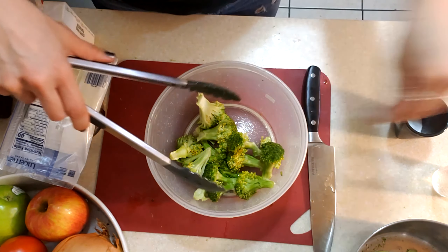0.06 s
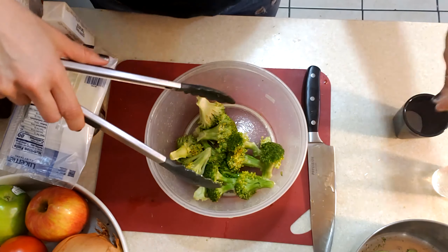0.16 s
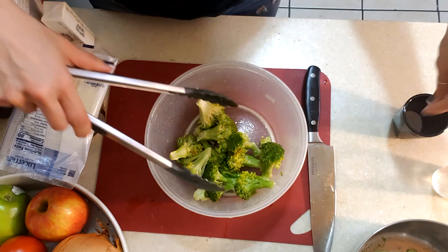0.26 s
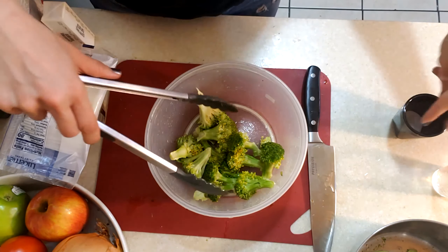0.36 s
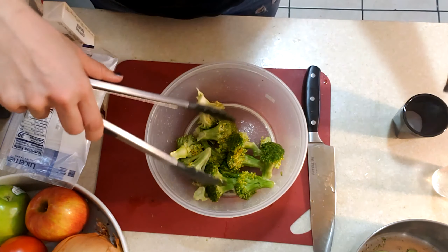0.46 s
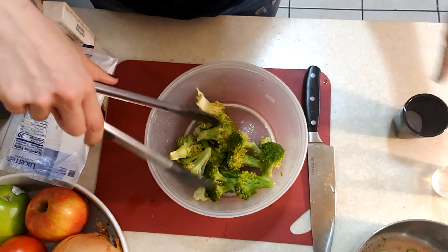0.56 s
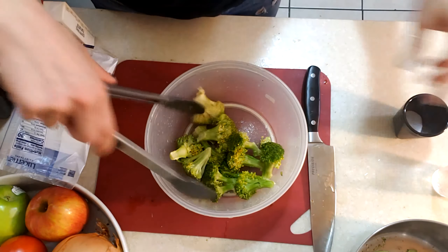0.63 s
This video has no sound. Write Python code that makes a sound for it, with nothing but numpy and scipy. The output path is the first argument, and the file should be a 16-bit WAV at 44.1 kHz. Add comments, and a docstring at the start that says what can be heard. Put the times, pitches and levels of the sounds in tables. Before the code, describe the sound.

Close clattering of tong tips and florets against a plastic bowl, uneven bursts with a brief quiet gap, over a faint refrigerator hum.

```python
"""Steel tongs toss florets in a plastic bowl on a board, in a small hard-walled kitchen.
Tong tips and florets knock the bowl: noise bursts coloured by its resonances. Strokes through the
florets are filtered friction grains; the tong hinge jingles in decaying sines. A refrigerator hums in
sines; steady narrow noise tones, low drones and one faint thin whine, lie over the room air.
A close stereo microphone ducks its bass."""
import sys
import numpy as np
from scipy import signal
from scipy.fft import rfft, irfft, next_fast_len
from scipy.io import wavfile
from scipy.ndimage import uniform_filter1d

SR = 44100
rng = np.random.default_rng(int(sys.argv[2]) if len(sys.argv) > 2 else 0)


def int16_out(signal):
    """Quantize to a 16-bit WAV file."""
    q = np.round(np.clip(np.atleast_2d(signal).T, -1, 1) * 32767)
    wavfile.write(sys.argv[1], SR, q.astype(np.int16))


N = 412776
HZ = np.fft.rfftfreq(next_fast_len(N + SR), 1 / SR) + 1   # +1 keeps the log finite

# refrigerator tones: (frequency [Hz], level [dB rms before the microphone])
HUM_TONES = [(59.2, -71.5), (118.4, -74)]
# steady narrow noise tones, low drones and one faint thin whine: (centre [Hz], width [Hz], level [dB])
NARROW_TONES = [(247, 25, -81.5), (293, 20, -79.5), (345, 12, -85.5), (573, 16, -89), (519, 9, -84),
                (8300, 12, -101)]
# room air spectrum, shape only: (frequency [Hz], density [dB])
AIR_SPECTRUM = [(20, -21), (50, -17), (95, -20.5), (170, -8), (260, -6.5), (420, -9), (700, -16.5),
                (1000, -22.5), (4400, -29), (7500, -37.5), (13000, -31), (16500, -35.5)]
AIR_DB = -75.5

# tong strokes through the florets: (start [s], length [s], rumble level [dB], hiss level [dB])
TONG_STROKES = [(0.237, 0.052, -55.5, -64), (0.672, 0.17, -57.5, -60), (1.032, .12, -59, -62),
                (1.417, 0.066, -65, -78), (2.122, 0.035, -70, -61), (2.33, 0.023, -46.5, -74),
                (2.54, 0.23, -52, -58.5), (3.143, 0.048, -64, -70), (3.281, 0.13, -56, -66),
                (3.801, 0.035, -95, -83), (5.515, 0.023, -61, -59), (5.877, 0.055, -44.5, -72),
                (5.994, 0.05, -57.5, -60), (6.4, 0.093, -55, -66), (6.548, 0.071, -64.5, -63),
                (6.7, 0.089, -76, -75), (7.056, .1, -58, -68), (7.56, 0.083, -49.5, -54),
                (8.079, 0.11, -55, -80), (8.252, 0.18, -63.5, -63.5), (8.66, 0.17, -75.5, -96)]
STROKE_ATTACK_DB_PER_S, STROKE_RELEASE_DB_PER_S = 496, 171.5
# light stirring under the strokes: (time [s], rumble level [dB], hiss level [dB])
STIR_LEVELS = [(0, -68.5, -79.5), (0.4, -74.5, -96), (0.6, -84.5, -89), (1.3, -69.5, -76),
               (2.0, -67.5, -77), (2.9, -82, -81), (3.1, -64.5, -75.5), (3.6, -69.5, -82),
               (4.1, -80.5, -86.5), (5.3, -80.5, -87), (5.6, -67.5, -82.5), (6.201, -62.5, -77),
               (6.901, -81.5, -81.5), (7.3, -69.5, -75), (7.9, -79.5, -89), (8.85, -65.5, -83),
               (9.0, -97.5, -103), (9.36, -79, -87.5)]
# friction spectra, shape only: (frequency [Hz], density [dB])
RUMBLE_SPECTRUM = [(40, -6), (120, -15.5), (300, 0.5), (800, -1.5), (1600, -8), (3000, -31)]
HISS_SPECTRUM = [(900, -16.5), (2200, -3), (5000, -2.5), (7000, -11.5), (12000, -5), (16000, -13)]

# tong tips and florets on the bowl: (time [s], peak [dB before pan and microphone],
# board thud, hollow ring, brightness [dB re wall clack], contact decay [ms], favoured note [Hz])
BOWL_KNOCKS = [(0.674, -32, -7.5, -5, -9.5, 6.7, 1200), (0.717, -42.5, -14.5, -4, -7.5, 3.1, 1430),
               (0.743, -7, -13, -6.5, -8.5, 2.46, 1140), (0.799, -9.5, -12.5, -7.5, -10, 2.6, 1330),
               (0.828, -15, -30, -2, -8.5, 2.8, 886), (1.049, -16.5, -10.5, -8.5, -3, 4.3, 1430),
               (1.078, -2, -10.5, -6.5, 5, 3.77, 2400), (1.163, -20.5, -7, 9.5, 2.5, 2.8, 773),
               (1.177, -30, 3.5, -5, -0.5, 3.1, 740), (1.441, -36.5, 8.5, 16.5, 14, 6, 3480),
               (1.479, -41.5, -2, 11.5, 11.5, 13.5, 3450), (1.505, -46, -2, 5, 16, 4, 3450),
               (1.527, -46, 9, 14, 13, 7.6, 755), (1.592, -50.5, -13, 5, -1, 4.9, 765),
               (1.705, -41, 6.5, 0.5, -9, 3.8, 517), (1.862, -40.5, -5, -16.5, 3.5, 22, 2500),
               (1.927, -45, -15, -1.5, 11.5, 11, 2500), (1.989, -23.5, -4.5, -10, 4, 3.1, 2360),
               (2.038, -16.5, -13.5, -11.5, 3.5, 3, 2430), (2.065, -23, 6.5, 4, -18, 2.3, 859),
               (2.103, -11.5, -18.5, 11, -7, 3.7, 818), (2.303, -31.5, 0, 9, 3, 16.4, 604),
               (2.332, -23.5, -10, 13.5, 12.5, 4.9, 600), (2.355, -23.5, -17.5, 3, -8.5, 2.2, 976),
               (2.524, -13.5, -10.5, -11.5, 3, 4.26, 1125), (2.583, -21, -20.5, -19.5, -3, 4.6, 1148),
               (2.668, -29.5, 9.5, 14.5, 2.5, 16, 803), (2.685, -10, -5, 1, -3.5, 3.55, 744),
               (2.79, -40.5, 2, 5, 7, 9.6, 720), (3.127, -22, -18, -11, -1.5, 6.6, 1140),
               (3.261, -30, -12.5, -20, -6.5, 4.1, 2320), (3.311, -15.5, -7.5, -2, -11, 4.4, 750),
               (3.589, -42.5, -7, 2, -20, 4.7, 765), (3.729, -58, 14, -6, 6, 17, 2434),
               (4.005, -40.5, 1, 1, 8.5, 2.9, 2760), (4.028, -38, -6, -2, 12.5, 4.3, 2750),
               (4.322, -52, 38, 20, 14, 4.4, 531), (4.573, -57, -10, 4, 5.5, 17.5, 2750),
               (5.396, -7, -19.5, 5, -12.5, 3.1, 747), (5.454, -25, -14.5, 10.5, -6, 5.9, 768),
               (5.484, -25, -26.5, -2, -15.5, 2.3, 820), (5.518, -24, -9.5, -5.5, -21.5, 2.9, 750),
               (5.574, -31, -4, 15, -2.5, 4.8, 875), (5.739, -48, -16, 12, -26, 4.0, 770),
               (5.771, -35.5, -6.5, 24, -20, 5.1, 767), (5.832, -20.5, -24.5, -14, -12.5, 3.5, 1400),
               (5.872, -9, -8.5, -5, -6, 3.7, 1203), (5.974, -2.5, -16.5, -2, -7.5, 2.3, 790),
               (5.988, -15, -7.5, 10.5, -7.5, 2.4, 570), (6.294, -34.5, -15, -9, -6.5, 3.1, 1410),
               (6.353, -14.5, -9.5, -1, -4.5, 5.2, 1350), (6.525, -18.5, -42, -0.5, -8, 3.6, 730),
               (6.566, -35.5, -18, -10, 17, 3, 5200), (6.93, -20.5, -5.5, -10.5, -3.5, 5.8, 528),
               (6.954, -16.5, 1, -6, 0, 2.32, 532), (7.049, -2.5, -10, -3.5, -7.5, 2.95, 800),
               (7.274, -47.5, -17, -5, -13, 7, 762), (7.379, -39.5, -6, 5, -13.5, 4.3, 747),
               (7.412, -23, -7, -4.5, -3.5, 4, 592), (7.52, -34.5, -30, -1, -10, 1.8, 751),
               (7.547, -22.5, -4.5, -1.5, -2, 15, 1256), (7.608, -10.5, -21.5, 1, -12, 3.14, 1243),
               (7.927, -35, 6, 8, -4, 8.6, 902), (7.947, -14, 0.5, -13, 1, 3.2, 1120),
               (7.975, -21, -14, -5, -1.5, 8.7, 1110), (8.105, -17.5, -8, 3, -1, 3.9, 2450),
               (8.189, -32, -6, -2, -2.5, 4.5, 2530), (8.214, -24.5, -38, -37, -1, 12.3, 3940),
               (8.233, -28.5, -42, -7, -1, 3.5, 1480), (8.311, -40.5, -6, -4, -8.5, 2.2, 760),
               (8.35, -43, -3, 2, 0.5, 12.5, 1230), (8.44, -43.5, -4, -6, 2, 5.6, 538),
               (8.507, -46.5, 2, 24, -6, 4.0, 536), (8.576, -48.5, -10, 25, -5, 2, 771),
               (8.633, -50.5, -23, 11, -23, 4.5, 761), (8.674, -34.5, -13, -8.5, -16, 6.1, 529),
               (8.759, -49, -19, -5, -2, 13, 1200), (8.787, -35.5, -8.5, -3, -9.5, 3, 544)]
# centres of thud, hollow ring, clack, snap, tick: frequency [Hz]
KNOCK_BANDS_HZ = [290, 720, 1700, 4300, 10500]
# bowl and board resonances: (centre [Hz], width [Hz], mean lift [dB])
BOWL_RESONANCES = [(77.5, 17, 11.5), (182, 56, 5), (230, 130, 5.5), (318.8, 61, 11), (522.5, 28, 10.5),
                   (568, 55, 4), (670, 34, 7.5), (756.8, 62, 5), (908, 270, 3), (1170, 140, 4.5),
                   (1320, 150, 2), (1685, 49, -5), (1994, 280, 3), (2478, 360, 2.5), (2900, 110, 1.5),
                   (3560, 250, 1.5), (4802, 420, 4), (5420, 510, 2.5)]
TICK_PER_BRIGHTNESS, TICK_DB = 1.51, -6.5
RISE_MS, RISE_PER_CONTACT = 0.38, 0.36   # long contacts also start softly
NOTE_LIFT_DB, RIM_HZ, RIM_LIFT_DB = 6.5, 1880, 3.5   # every knock wakes the rim note
PAN_DB, PAN_SCATTER_DB = -1.1, 0.5   # left re right: fixed lean plus random scatter, new each knock
UNEVEN_DB, UNEVEN_FROM_HZ, UNEVEN_TO_HZ = 3, 1000, 5530   # scatter of broad resonances, new each knock

# tong hinge rattles: (time [s], level [dB before partial offsets])
HINGE_JINGLES = [(3.819, -68), (3.846, -64), (3.869, -63.5), (4.011, -47.5), (4.033, -48), (4.059, -62),
                 (4.315, -68), (4.329, -78), (4.577, -76), (4.601, -69), (4.619, -76)]
# steel arm partials: (frequency [Hz], mean offset [dB], t60 [s])
TONG_PARTIALS = [(2710, -6, 0.18), (2740, -10, 0.16), (4800, -2, .03), (7100, -1.5, 0.073),
                 (7500, -4, 0.044), (8030, 1, 0.068), (8500, -5, 0.037), (11000, -4, 0.051)]
HARD_JINGLE_DB, UPPER_DB_PER_DB = -35.5, 0.31   # upper partials lose this much extra below the hard level

# echo decay: (frequency [Hz], t60 [s])
ECHO_T60 = [(100, 0.41), (400, 0.32), (1000, 0.31), (2800, 0.32), (7000, .33), (15000, 0.23)]
# echo spectrum, shape only: (frequency [Hz], level [dB])
ECHO_COLOUR = [(60, 7), (250, -4.5), (700, -2), (2500, 1.5), (8000, -1.5), (15000, -1.5)]
ECHO_DB = -4

# stereo width, capped at 0 dB in use: (frequency [Hz], side re mid [dB])
STEREO_WIDTH = [(60, -14.5), (130, -18.5), (290, -10.5), (640, -9), (1410, -2), (3100, -3), (6820, -1),
                (15000, 0.5)]
# microphone ports: (frequency [Hz], left re right [dB])
PORT_LEAN = [(60, 0.5), (120, -2), (240, -1), (480, 1.5), (950, -1), (1890, -1.5), (3770, 6.5), (7520, -3),
             (15000, -8)]
CUTOFF_HZ = 16150


def amp(db):
    """Decibels to gain."""
    return 10 ** (np.asarray(db) / 20)


def unit(x):
    """Scale to rms 1."""
    return x / np.sqrt(np.mean(x ** 2) + 1e-20)


def at_hz(points, hz):
    """Read a (Hz, value) table on a log-frequency axis."""
    f, v = np.transpose(points)
    return np.interp(np.log(hz), np.log(np.maximum(f, 1)), v)


def shaped(x, gain):
    """Multiply the spectrum by a gain given on the grid HZ."""
    size = 2 * (len(HZ) - 1)
    return irfft(rfft(x, size) * gain, size)[..., :N]


def side_gain(hz):
    """Side re mid gain of a diffuse stereo sound."""
    return amp(np.minimum(at_hz(STEREO_WIDTH, hz), 0))


def spread(pair):
    """Two unrelated signals become mid and side of a left-right pair."""
    mid, side = pair[0], shaped(pair[1], side_gain(HZ))
    return np.array([mid + side, mid - side])


def peak_shape(hz, centre_hz, width_hz):
    """Resonance curve of height 1 and full width width_hz at half height."""
    return 1 / (1 + (2 * (hz - centre_hz) / width_hz) ** 2)


def background():
    """Refrigerator hum in sines, steady tones in narrow noise, room air in broad noise."""
    t = np.arange(N) / SR
    hum = np.zeros(N)
    for hz, level_db in HUM_TONES:
        hum += np.sqrt(2) * amp(level_db) * np.sin(2 * np.pi * (hz * t + rng.random()))
    colour = amp(AIR_DB) * unit(amp(at_hz(AIR_SPECTRUM, HZ)))
    for hz, width_hz, level_db in NARROW_TONES:
        colour = colour + amp(level_db) * unit(peak_shape(HZ, hz, width_hz))
    return hum + spread(shaped(rng.standard_normal((2, N)), colour))


def friction(column):
    """Gain of one friction layer: the stirring plus every stroke with its attack, hold and release."""
    t, stir = np.arange(0, N + 64, 64) / SR, np.transpose(STIR_LEVELS)
    gain = amp(np.interp(t, stir[0], stir[1 + column]))
    for start_s, length_s, *level_db in TONG_STROKES:
        before_s = np.maximum(start_s - t, 0)
        after_s = np.maximum(t - start_s - length_s, 0)
        slope_db = STROKE_ATTACK_DB_PER_S * before_s + STROKE_RELEASE_DB_PER_S * after_s
        gain = gain + amp(level_db[column] - slope_db)
    return np.interp(np.arange(N) / SR, t, gain)


def sliding():
    """Dense uneven grains of friction: a dull rumble through the bowl and a bright wet hiss."""
    out = 0
    for column, (colour, grains_per_s) in enumerate(((RUMBLE_SPECTRUM, 3500), (HISS_SPECTRUM, 4000))):
        sizes = amp(2.3 * np.minimum(rng.exponential(1, (2, N)), 4))
        struck = rng.random((2, N)) < grains_per_s / SR
        grains = rng.standard_normal((2, N)) * struck * sizes
        out = out + friction(column) * unit(shaped(grains, amp(at_hz(colour, HZ))))
    return spread(out)


def causal(mag_db):
    """Minimum-phase spectrum with these levels: nothing sounds early."""
    cep = irfft(mag_db * np.log(10) / 20)
    half = cep.shape[-1] // 2
    return np.exp(rfft(cep * np.r_[1, 2 * np.ones(half - 1), 1, np.zeros(half - 1)]))


def knock_colour(hz, thud_db, hollow_db, bright_db, note_hz):
    """Spectrum [dB] of one knock: contact colour, favoured and rim notes, bowl resonances, scatter."""
    tick_db = TICK_DB + TICK_PER_BRIGHTNESS * bright_db
    bands = list(zip([40.0, *KNOCK_BANDS_HZ],
                     [thud_db - 28, thud_db, hollow_db, 0, bright_db, tick_db]))
    mag_db = at_hz(bands, hz) - 2.58 * np.log2(hz)   # tilt in dB per octave
    mag_db = mag_db + NOTE_LIFT_DB / (1 + ((hz / note_hz - 1) / 0.14) ** 2)
    mag_db = mag_db + RIM_LIFT_DB / (1 + ((hz / RIM_HZ - 1) / 0.086) ** 2)
    for centre_hz, width_hz, lift_db in BOWL_RESONANCES:
        mag_db = mag_db + lift_db * (0.5 + rng.random()) * peak_shape(hz, centre_hz, width_hz)
    uneven = unit(uniform_filter1d(rng.standard_normal(len(hz)), size=55))
    return mag_db + UNEVEN_DB * uneven / (1 + (UNEVEN_FROM_HZ / hz) ** 2 + (hz / UNEVEN_TO_HZ) ** 4)


def knocks():
    """A knock is a grainy burst of contacts with its own colour, shaped by the bowl's resonances."""
    size = 8192
    t, hz = np.arange(size) / SR, np.fft.rfftfreq(size, 1 / SR) + 1
    out, wide = np.zeros((2, N + size)), side_gain(hz)
    lag_s = 0.0076 / (1 + (hz / 410) ** 2)   # the heavy board answers later than the thin wall
    late = np.exp(-2j * np.pi * np.cumsum(lag_s) * SR / size)
    for time_s, peak_db, thud_db, hollow_db, bright_db, contact_ms, note_hz in BOWL_KNOCKS:
        rise_ms = RISE_MS + RISE_PER_CONTACT * contact_ms
        fade = np.exp(-1000 * t / contact_ms) * (1 - np.exp(-1000 * t / rise_ms)) ** 2
        grain_sizes = amp(3.4 * rng.standard_normal(size))
        burst = rfft(rng.standard_normal((2, size)) * grain_sizes * fade)
        own_db = 10 * np.log10(uniform_filter1d(np.abs(burst) ** 2, size=31))
        mag_db = knock_colour(hz, thud_db, hollow_db, bright_db, note_hz)
        recolour = causal(mag_db - own_db)   # replaces the burst's own colour
        mid, side = irfft(burst * late * recolour * [np.ones_like(wide), wide])
        pan_db = PAN_DB + PAN_SCATTER_DB * rng.standard_normal()
        pair = np.array([mid + side, mid - side]) * amp([[0.5 * pan_db], [-0.5 * pan_db]])
        start = round(time_s * SR)
        out[:, start:start + size] += pair * amp(peak_db) / np.abs(mid).max()
    return out[:, :N]


def ring(clicks, hz, t60_s):
    """A unit click sets a decaying sine of starting height 1 ringing."""
    r, w = amp(-60 / (t60_s * SR)), 2 * np.pi * hz / SR
    return signal.lfilter([0, np.sin(w)], [1, -2 * r * np.cos(w), r * r], clicks + 1e-18)


def tongs():
    """The steel arms ring at a few thin partials when the hinge rattles; hard rattles ring brighter."""
    time_s, level_db = np.transpose(HINGE_JINGLES)
    upper_db = UPPER_DB_PER_DB * (level_db - HARD_JINGLE_DB)
    out = np.zeros(N)
    for k, (hz, partial_db, t60_s) in enumerate(TONG_PARTIALS):
        scatter_db = 3.8 * rng.standard_normal(len(time_s))
        clicks = np.zeros(N)
        clicks[(time_s * SR).astype(int)] = amp(level_db + partial_db + upper_db * (k > 1) + scatter_db)
        out += ring(clicks, hz, t60_s)
    return out


def kitchen(x):
    """Echo cloud: noise dying band by band, building up over the first milliseconds."""
    t, tail = np.arange(SR) / SR, np.zeros((2, N))
    white = rng.standard_normal((2, 2, SR))   # neighbouring bands use different noise
    edges_hz = 60 * 2 ** np.arange(0, 8.6, 0.5)
    build_up = 1 - np.exp(-t / 0.006)
    for k, (low, high) in enumerate(zip(edges_hz, edges_hz[1:])):
        sos = signal.butter(2, [low, high], "band", fs=SR, output="sos")
        decay = amp(-60 * t / at_hz(ECHO_T60, np.sqrt(low * high)))
        tail[:, :SR] += signal.sosfilt(sos, white[k % 2]) * decay * build_up
    tail = spread(shaped(tail, amp(at_hz(ECHO_COLOUR, HZ))))[:, :SR]
    tail = tail / np.sqrt(np.sum(tail ** 2) / 2)   # mean channel energy 1
    return signal.fftconvolve(x, tail, axes=1)[:, :N]


def scene():
    """Knocks and jingles with their echo, plus friction and background."""
    near = knocks() + tongs()
    echo = amp(ECHO_DB) * kitchen(near.mean(0, keepdims=True))
    return near + echo + sliding() + background()


def record(dry):
    """Ports of unequal colour; level-driven deep-bass ducking; rounded peaks; the top is cut."""
    lean_db = at_hz(PORT_LEAN, HZ)
    x = shaped(dry, amp(np.array([0.5 * lean_db, -0.5 * lean_db])))
    level_db = 10 * np.log10(uniform_filter1d(np.mean(x ** 2, 0), size=441) + 1e-12)
    ramp_db = 70 * np.arange(N) / SR   # held level falls 70 dB per s at most
    held_db = np.maximum.accumulate(level_db + ramp_db) - ramp_db
    cut_db = 0.27 * np.maximum(held_db + 58, 0)
    smooth = np.exp(-1 / (0.02 * SR))
    cut_db = signal.lfilter([1 - smooth], [1, -smooth], cut_db)
    bass = shaped(x, 1 / (1 + (HZ / 110) ** 6))
    x = x - bass * (1 - amp(-cut_db))
    rounded = 0.79 * np.tanh(x / 1.027)
    return signal.sosfilt(signal.cheby2(24, 60, CUTOFF_HZ, fs=SR, output="sos"), rounded)


dry = scene()
out = record(dry)
int16_out(out)
```